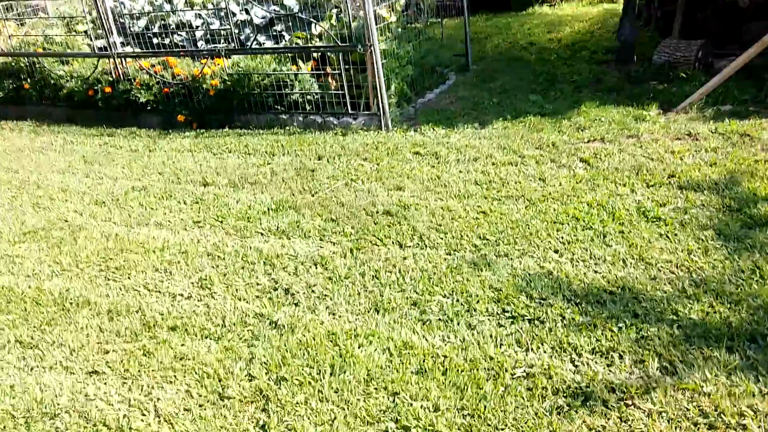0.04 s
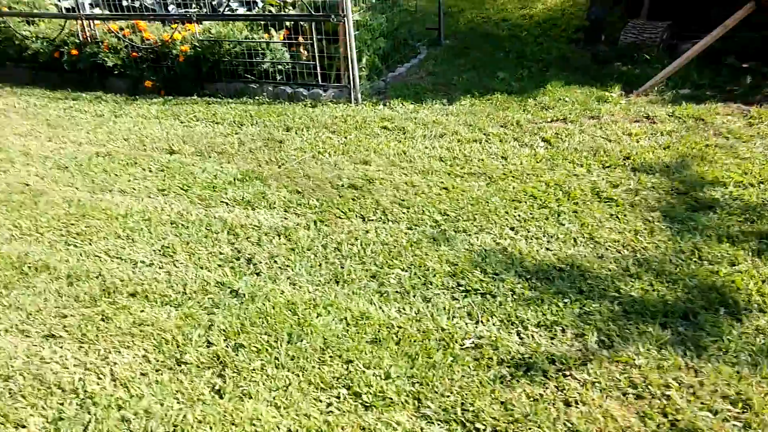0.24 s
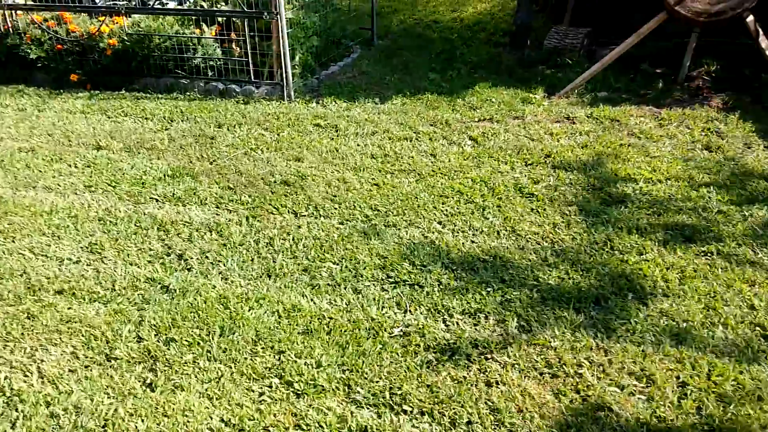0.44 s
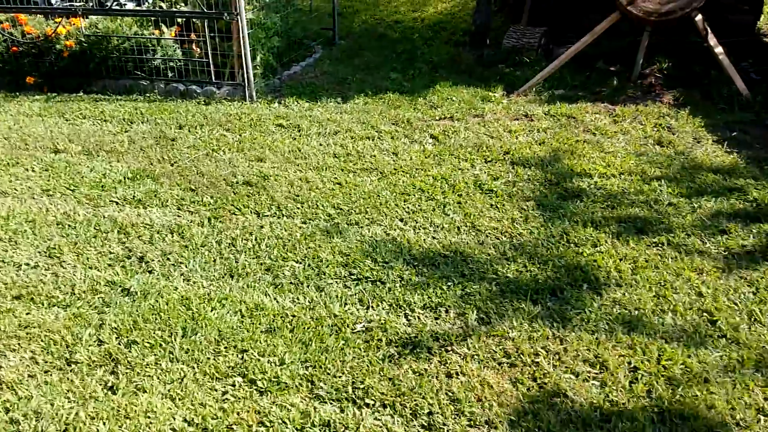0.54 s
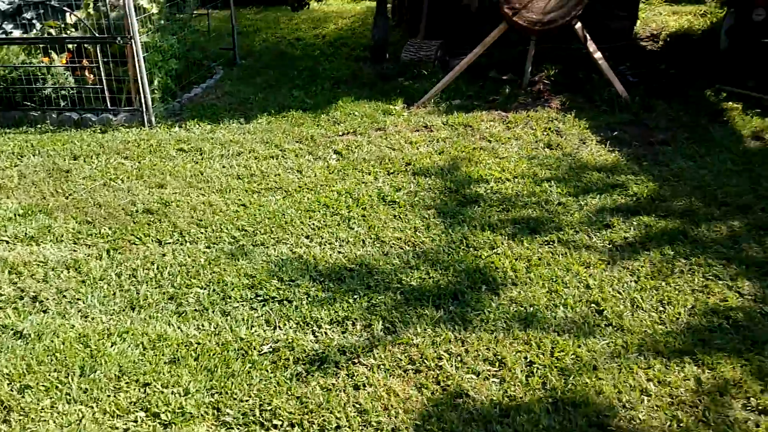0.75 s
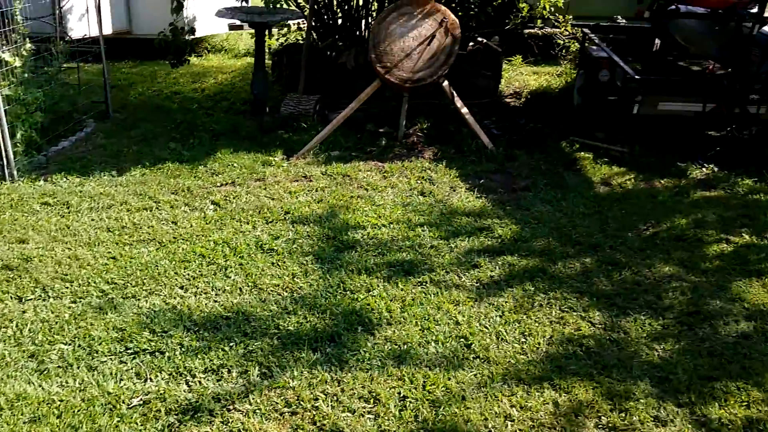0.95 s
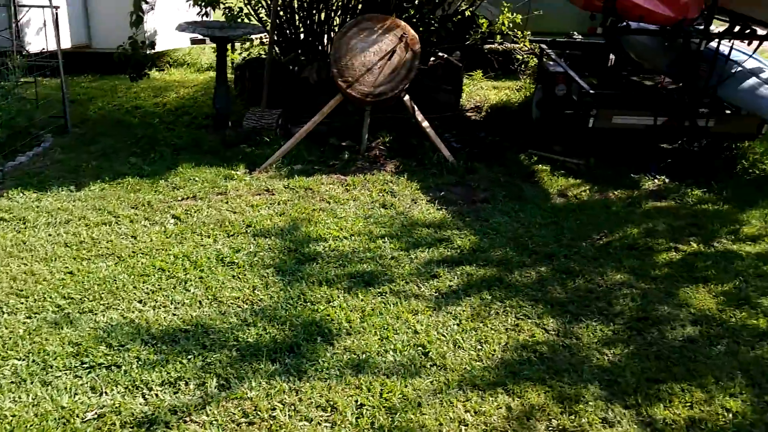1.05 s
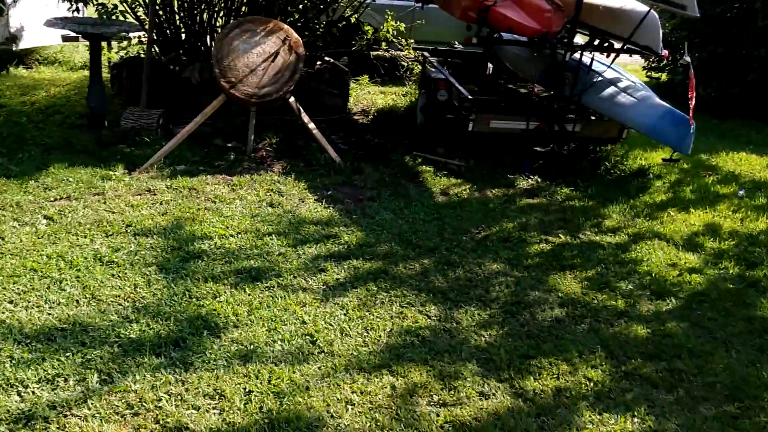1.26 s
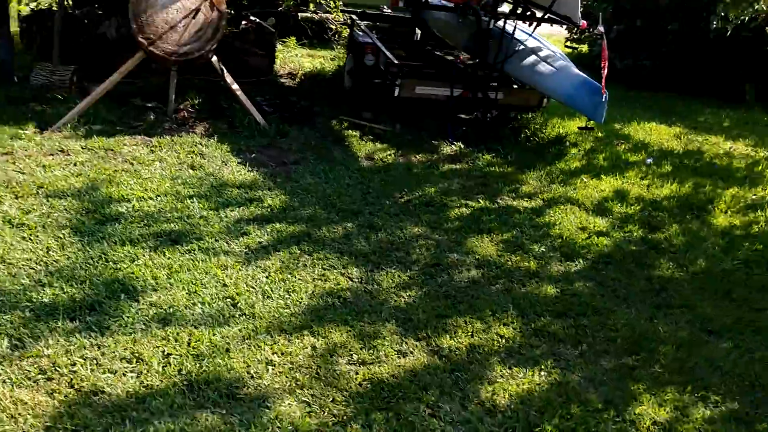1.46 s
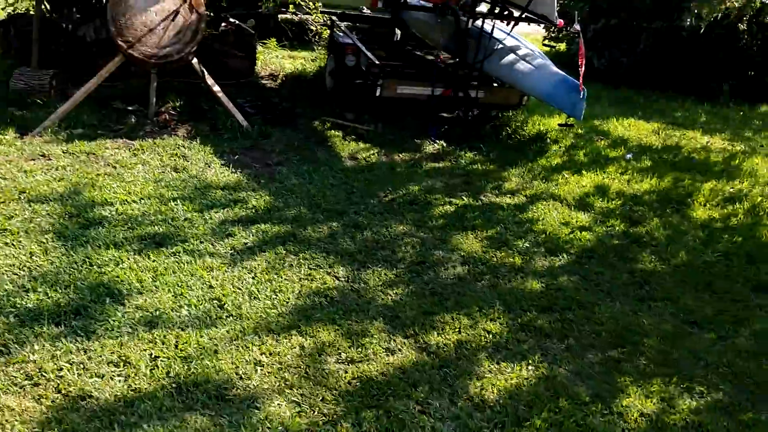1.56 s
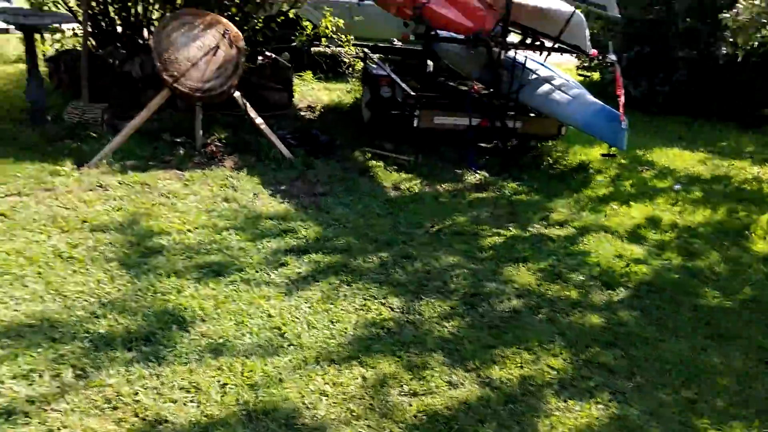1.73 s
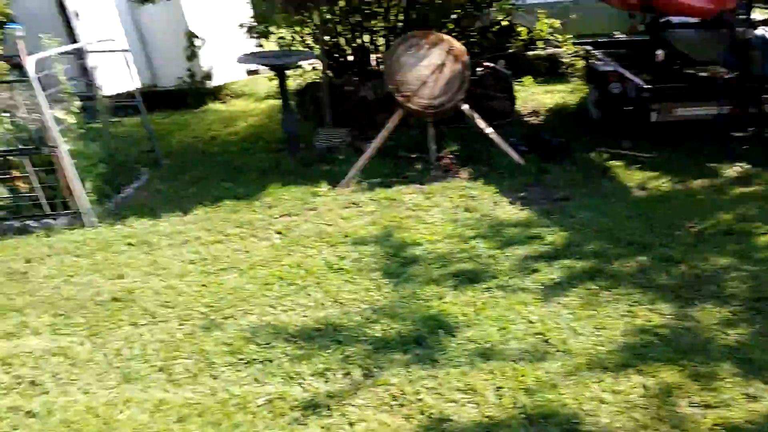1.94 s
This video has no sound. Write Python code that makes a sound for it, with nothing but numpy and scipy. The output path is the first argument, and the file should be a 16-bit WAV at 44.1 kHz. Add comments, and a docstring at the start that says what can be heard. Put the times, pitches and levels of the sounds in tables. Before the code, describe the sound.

A thrown knife sticks in a wooden block a few metres away with one sharp knock and a brief backyard echo. A small bird chirps faintly, then clothes rustle and tick near the microphone over a low hum.

```python
"""Knife throw in a backyard

A thrown knife sticks in a round wooden block on a stand, a few metres from the microphone. The one
hard knock drives the recorder's limiter and comes back from walls and fences. A small bird chirps,
clothes rustle and tick close to the microphone, and a distant machine hums under a low outdoor rumble.
The background jumps briefly in level as the recorder's noise suppressor opens and closes."""
import sys
import numpy as np
from scipy import signal
from scipy.io import wavfile
from scipy.ndimage import uniform_filter1d, minimum_filter1d

SR = 44100
rng = np.random.default_rng(int(sys.argv[2]) if len(sys.argv) > 2 else 0)


def put_to_file(sound):
    """Save the sound as 16-bit audio at rate SR, in the file named by the first command-line argument."""
    columns = np.atleast_2d(sound).T  # one column per channel
    safe = np.clip(columns, -1, 1)
    whole_steps = np.round(safe * 32767)
    wavfile.write(sys.argv[1], SR, whole_steps.astype(np.int16))


N = 88200
T = np.arange(N) / SR
HIT_S, YARD_RISE_S = 0.2412, 0.028

# Modes of blade and block. Each row: pitch in Hz, level in dB, t60 in seconds, left over right in dB.
TARGET_MODES = [(158.8, -13, 0.044, 1.5), (502, -11.5, 0.059, -0.5), (592, -6.5, 0.053, 0.5),
                (1047, -13.5, 0.052, 0.5), (996, -20, .22, 5.5), (1253, -15, .08, 10.5),
                (1615, -17, .09, 3.5), (1663, -22, .24, 10), (2204, -14, 0.039, 3), (2404, -16.5, .11, 7.5),
                (3026, -13, 0.056, -1), (3165, -25.5, .2, 14.5), (3660, -32.5, 0.23, 5.5)]
# Diffuse sound at the microphone. Each row: frequency in Hz, left-right correlation.
DIFFUSE_LIKENESS = [(100, 0.99), (300, .85), (650, .5), (1400, 0), (15000, 0.16)]


def from_db(db):
    """Decibels to gain."""
    return 10 ** (np.asarray(db) / 20)


def unit_rms(x):
    """Scale to rms 1."""
    return x / np.sqrt(np.mean(x ** 2) + 1e-20)


def at_hz(points, hz, column=1):
    """Read a column of a table on a log-frequency axis."""
    points = np.array(points)
    return np.interp(np.log(hz), np.log(points[:, 0]), points[:, column])


def pan(db):
    """Left and right gains, with the left louder by db."""
    return from_db(np.array([[.5], [-.5]]) * db)


def dying(start, t60):
    """Silence, then an exponential decay from the start."""
    return (T >= start) * np.exp(-np.log(1000) * np.clip((T - start) / t60, 0, 10))


def rising(start, rise_s):
    """A soft attack from 0 to 1."""
    return 1 - np.exp(-np.maximum(T - start, 0) / rise_s)


def ring(start, hz, t60):
    """One struck mode."""
    return dying(start, t60) * np.sin(2 * np.pi * hz * (T - start))


def drift(rate_hz):
    """A random wander below rate_hz; rms 1."""
    lowpass = signal.butter(2, rate_hz, fs=SR, output="sos")
    return unit_rms(signal.sosfilt(lowpass, rng.standard_normal(2 * N))[N:])


def resonance(hz, width_hz):
    """Noise in a resonance whose centre may move; rms 1."""
    phase = 2 * np.pi * np.cumsum(hz + np.zeros(N)) / SR
    return unit_rms(drift(width_hz / 2) * np.cos(phase) + drift(width_hz / 2) * np.sin(phase))


def wide_resonance(hz, width_hz):
    """Resonant noise, independent on left and right."""
    return np.array([resonance(hz, width_hz) for _ in range(2)])


def banded_noise(spectrum, likeness, envelope=lambda hz: 1):
    """Stereo noise in bands; rms near 1 before each band gets its balance and envelope."""
    edges_hz = np.r_[40, 80, 140, 220, 320, np.geomspace(440, 16500, 23)]
    white = rng.standard_normal((2, 2, N))
    out, power = 0, 0
    for k, (low, high) in enumerate(zip(edges_hz, edges_hz[1:])):
        bandpass = signal.butter(2, [low, high], "band", fs=SR, output="sos")
        mid, side = signal.sosfilt(bandpass, white[k % 2])
        hz = np.sqrt(low * high)
        alike = np.clip(at_hz(likeness, hz), -1, 1)
        gain = from_db(at_hz(spectrum, hz))
        band = np.sqrt(1 + alike) * mid + np.sqrt(1 - alike) * side * [[1], [-1]]
        out = out + gain * band * pan(at_hz(spectrum, hz, column=2)) * envelope(hz)
        power += 2 * gain ** 2 * (high - low) / (SR / 2)
    return out / np.sqrt(power)


def background():
    """Outdoor hiss, rumble and far machine, jumping in level as the noise suppressor opens and closes."""
    # Set times when the recorder's noise suppressor opens.
    # Each row: start and end in seconds, nominal rise in dB.
    openings = [(0.086, 0.127, 9), (0.25, 0.621, 8.5), (0.93, 0.943, 14), (0.973, 1.009, 10),
                (1.062, 1.152, 7.5), (1.199, 1.314, 9), (1.348, 1.419, 9), (1.511, 1.559, 7),
                (1.597, 1.691, 8.5), (1.755, 1.792, 9)]
    # Rumble bands. Each row: centre in Hz, width in Hz, relative level in dB.
    rumble_bands = [(47.7, 4.7, -53), (85, 14, -53), (134.15, 42, -52.5), (194.7, 12, -71)]
    # Open-air hiss. Each row: frequency in Hz, relative density in dB, left over right in dB.
    air_spectrum = [(50.6, 15, -3.5), (354, 2.5, -2.5), (580, 1, 0.5), (1157, -4.5, 1.5), (1900, -6.5, 2.5),
                    (3000, -9.5, 3.5), (4500, -15, 0), (7600, -21, -0.5), (15000, -22.5, 1)]
    edge_s, low_depth = 0.031, 1.18  # the low end jumps more than the hiss
    gate_db = sum(db * np.clip(np.minimum(T - start, end - T) / edge_s + .5, 0, 1)
                  for start, end, db in openings)
    rumble = sum(from_db(db) * resonance(hz, width) for hz, width, db in rumble_bands)
    low_end = from_db(low_depth * gate_db - 1.5) * pan(db=2.0) * (rumble + machine())
    hiss = from_db(gate_db - 60) * banded_noise(air_spectrum, DIFFUSE_LIKENESS)
    return low_end + hiss


def machine():
    """A distant motor: a constant hum, a deep tone that comes and goes, and a brief wavering whine."""
    # Motor hum. Each row: pitch in Hz, relative level in dB.
    hum_tones = [(117.3, -56.5), (234.6, -59.5)]
    # Course of the deep engine tone. Each row: time in seconds, relative level in dB.
    drone_levels = [(0, -51.5), (.8, -66), (1.0, -48.5), (1.25, -47), (1.5, -48), (1.75, -48.5), (2.0, -59)]
    # Course of the whine. Each row: time in seconds, relative level in dB.
    whine_levels = [(.95, -75.5), (1.1, -71), (1.4, -69), (1.5, -80)]
    drone_hz, whine_hz, pitch_waver, overtone_fall_db = 130.9, 578, 0.041, 9
    drone_db = np.interp(T, *np.transpose(drone_levels))
    whine_db = np.interp(T, *np.transpose(whine_levels))
    # Every partial wavers in level by about 1 dB.
    hum = sum(from_db(db + drift(17)) * np.sin(2 * np.pi * (hz * T + rng.random()))
              for hz, db in hum_tones + [(drone_hz, drone_db)])
    phase = 2 * np.pi * np.cumsum(whine_hz * (1 + pitch_waver * drift(7.9))) / SR
    whine = sum(from_db(whine_db - overtone_fall_db * k + drift(18)) * np.sin((2 * k + 1) * phase)
                for k in range(3))
    return np.sqrt(2) * (hum + whine)


def ticks():
    """Tiny dry contacts beside the microphone: a bright click, with a lower knock on the other side."""
    # Contacts. Each row: start in seconds, level in dB, click's left over right in dB, knock gain in dB.
    contacts = [(.034, -35, -9, -22), (.793, -44, 6, 0), (1.3012, -27, -4, 5)]
    # Modes of the click. Each row: pitch in Hz, relative level in dB, t60 in seconds.
    click_modes = [(4270, -10, 0.0017), (5800, -8, 0.0044)]
    # Modes of the knock, with the same columns.
    knock_modes = [(1020, -6.5, 0.0077), (1384, -8.5, 0.0079), (1810, -14.5, 0.011)]
    out = 0
    for start, db, side, knock_db in contacts:
        click = sum(from_db(level) * ring(start, hz, t60) for hz, level, t60 in click_modes)
        knock = sum(from_db(level) * ring(start, hz, t60) for hz, level, t60 in knock_modes)
        out = out + from_db(db) * (pan(side) * click + pan(-side) * from_db(knock_db) * knock)
    return signal.sosfilt(signal.butter(4, 7400, fs=SR, output="sos"), out)


def knife():
    """The point drives in a few metres away: wood fibres crack, and blade and block ring briefly."""
    # Splitting fibres. Each row: frequency in Hz, relative density in dB, left over right in dB.
    crack_spectrum = [(50, -1.5, 6), (250, -1.5, 11), (637, 3, -7.5), (1100, 7, 0.5), (1600, 4.5, -2),
                      (2050, 2, 6.5), (2490, -4, 9), (2720, -8, 10), (3350, -4.5, 0), (3900, -12, 10.5),
                      (5600, -16, 4.5), (6600, -28.5, -10.5), (8480, -31.5, -13), (11500, -29.5, -6),
                      (14500, -31.5, 1.5)]
    # Decay of the crack. Each row: frequency in Hz, t60 in seconds.
    crack_t60 = [(100, 0.11), (500, 0.066), (1200, .11), (2500, 0.15), (6000, 0.18), (14000, .13)]
    left_lag_s = 0.00034  # the knock reaches the right side of the microphone first
    thud = -ring(HIT_S, hz=800, t60=.009)  # first push of the block's face
    sway = from_db(-25) * ring(HIT_S, hz=55, t60=.12)  # the stand shakes under the blow
    modes = sum((-1) ** k * from_db(db) * pan(side) * ring(HIT_S, hz, t60)
                for k, (hz, db, t60, side) in enumerate(TARGET_MODES))
    fibres = banded_noise(crack_spectrum, likeness=[(200, 0.93), (1500, 0.81), (8000, 0.3)],
                          envelope=lambda hz: dying(HIT_S, at_hz(crack_t60, hz)))
    crack = from_db(-6) * fibres * rising(HIT_S, rise_s=0.0012)
    left, right = thud + sway + modes + crack
    return np.array([np.interp(T - left_lag_s, T, left), right])


def yard():
    """Walls and fences return the knock as a diffuse tail and a few noisy slaps."""
    # Scatter from the yard. Each row: frequency in Hz, relative density in dB, left over right in dB.
    tail_spectrum = [(59.7, 0, 2.5), (234, -8.5, 0), (600, 1.5, -2), (1080, 0, -2.5), (1700, 2, 3),
                     (3000, 0, 3), (4170, -11.5, -3), (6500, -20, -2.5), (9000, -39, -0.5),
                     (15000, -45, -0.5)]
    # Decay of the scatter. Each row: frequency in Hz, t60 in seconds.
    tail_t60 = [(100, 0.7), (600, 0.46), (1700, 0.44), (3500, 0.42), (7000, 0.24)]
    # Slaps. Each row: delay in seconds, level in dB, centre in Hz, left over right in dB.
    echoes = [(0.0188, -4, 2507, 12), (0.0682, -16.5, 3140, 6.5), (.076, -9.5, 1700, -5),
              (0.1217, -24, 1661, 19.5)]
    tail = banded_noise(tail_spectrum, DIFFUSE_LIKENESS, lambda hz: dying(HIT_S, at_hz(tail_t60, hz)))
    out = from_db(-20) * tail * rising(HIT_S, YARD_RISE_S)
    for delay, db, hz, side in echoes:
        envelope = dying(HIT_S + delay, t60=0.024) * rising(HIT_S + delay, rise_s=0.0033)
        out = out + from_db(db) * pan(side) * wide_resonance(hz, width_hz=1190) * envelope
    return out


def lingering_ring():
    """The yard scatters each mode of blade and block into a narrow band; long modes feed it most."""
    bands = sum(from_db(db) * np.sqrt(t60) * pan(side) * wide_resonance(hz, width_hz=35)
                for hz, db, t60, side in TARGET_MODES)
    return from_db(-10) * bands * dying(HIT_S, t60=0.37) * rising(HIT_S, YARD_RISE_S)


def bird():
    """A small bird's thin, unsteady notes arch and glide, with a short tail from the yard."""
    # Notes. Each row: start and length in seconds, pitch, arch and glide in Hz,
    # relative level in dB, left over right in dB.
    chirps = [(.406, .028, 6050, 1450, 100, -56, -4), (.443, .015, 6100, 80, 50, -49, -12),
              (.455, .02, 5420, 0, -180, -54, -8), (.501, .01, 5400, 40, -250, -48, -5),
              (.484, .05, 5050, 60, -300, -57, 5)]
    wobble_hz = 111.7 * drift(190)
    song = 0
    for start, length, hz, arch_hz, glide_hz, db, side in chirps:
        progress = np.clip((T - start) / length, 0, 1)
        arch = np.sin(np.pi * progress)
        pitch = hz + arch_hz * arch + glide_hz * progress + wobble_hz
        phase = 2 * np.pi * np.cumsum(pitch) / SR
        song = song + from_db(db) * pan(side) * np.sqrt(np.abs(arch)) * np.sin(phase)
    scatter = rng.standard_normal((2, N)) * dying(0, t60=.3)
    scatter /= np.sqrt(np.sum(scatter ** 2) / 2)
    tail = signal.fftconvolve(song.mean(axis=0)[None], scatter)[:, :N]
    return song + from_db(-1.5) * tail


def clothes():
    """Cloth rubs near the microphone, rising and fading: a gliding resonance over grainy hiss."""
    # Rubs. Each row: start, length and attack in seconds, level in dB,
    # first and last resonance in Hz, hiss relative to the resonance in dB.
    rubs = [(0.787, 0.22, 0.0018, -58, 1853, 1300, -1), (1.52, 0.094, 0.025, -48, 2069, 2200, -3),
            (1.596, 0.12, 0.029, -52, 2696, 2600, 4.5), (1.862, .13, 0.026, -59.5, 1932, 1630, -18)]
    # Cloth hiss. Each row: frequency in Hz, relative density in dB, left over right in dB.
    cloth_spectrum = [(450, 6, -3.5), (930, 5.5, 0.5), (1430, -22, 18), (2160, 2.5, 11), (3600, -14, -1),
                      (5600, -10.5, 1.5), (9400, -23, 0)]
    grain_db = 2
    hiss = banded_noise(cloth_spectrum, DIFFUSE_LIKENESS)
    out = 0
    for start, length, attack, db, from_hz, to_hz, hiss_db in rubs:
        progress = np.clip((T - start) / length, 0, 1)
        envelope = np.clip((T - start) / attack, 0, 1) * np.cos(np.pi / 2 * progress)
        swish = wide_resonance(from_hz + (to_hz - from_hz) * progress, width_hz=360)
        out = out + from_db(db) * envelope * (pan(db=3) * swish + from_db(hiss_db) * hiss)
    return out * from_db(grain_db * drift(134))


def crinkles():
    """The crisp top of the rustle: very high, airy hiss that builds to a peak and dies away."""
    # Crinkles in the cloth. Each row: time of the peak in seconds, level in dB.
    peaks = [(1.556, -52.5), (1.625, -62)]
    fade_s = 0.022
    envelope = sum(from_db(db) * np.exp(-np.abs(T - peak_s) / fade_s) for peak_s, db in peaks)
    return envelope * wide_resonance(hz=15200, width_hz=3900)


def scene():
    """The sounds of the yard in stereo, over a background gated by the noise suppressor."""
    knock = knife() + yard() + lingering_ring()
    return knock + from_db(-4) * bird() + ticks() + clothes() + crinkles() + background()


def record(dry):
    """The recorder: a low cut, a fast limiter that holds down the knock, and a steep top cut."""
    low_cut_hz, top_stop_hz = 38, 16600
    ceiling, limiter_s = .86, 0.00071
    x = signal.sosfilt(signal.butter(4, low_cut_hz, "high", fs=SR, output="sos"), dry)
    span = int(limiter_s * SR)
    needed_gain = ceiling / np.maximum(np.abs(x), ceiling)
    gain = uniform_filter1d(minimum_filter1d(needed_gain, span), span)
    return signal.sosfilt(signal.cheby2(16, 70, top_stop_hz, fs=SR, output="sos"), x * gain)


dry = scene()
out = record(dry)
put_to_file(out)
```